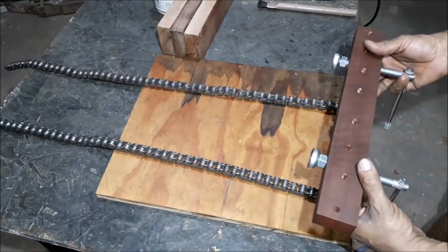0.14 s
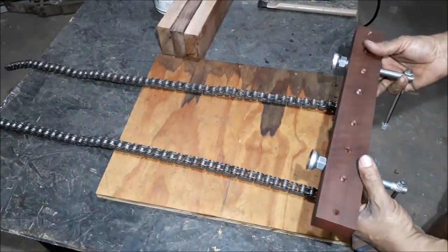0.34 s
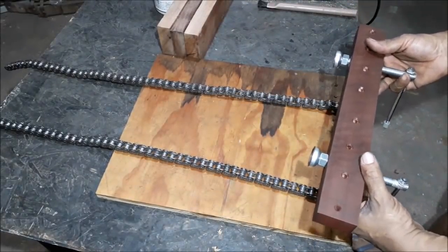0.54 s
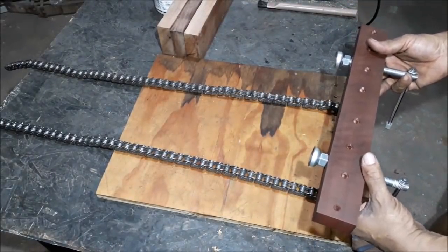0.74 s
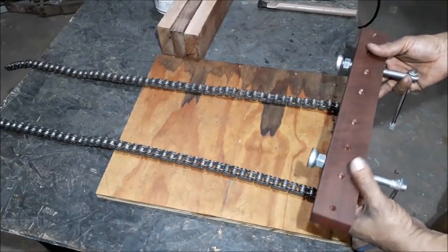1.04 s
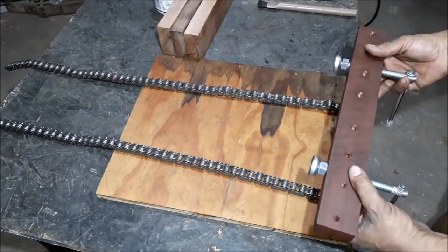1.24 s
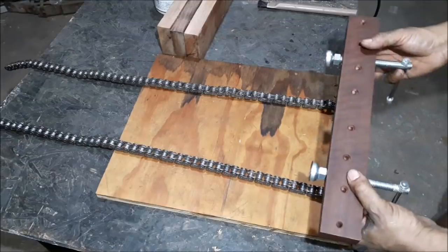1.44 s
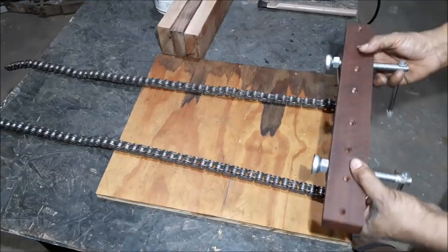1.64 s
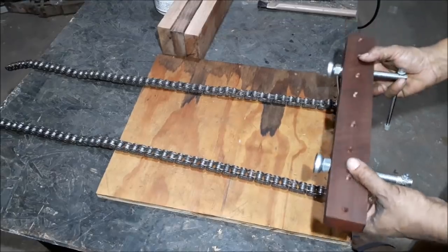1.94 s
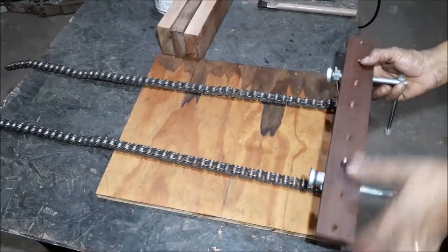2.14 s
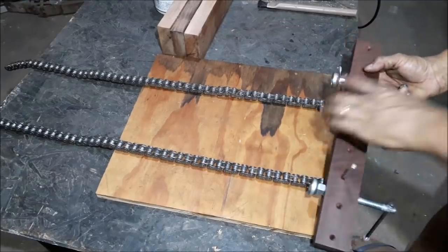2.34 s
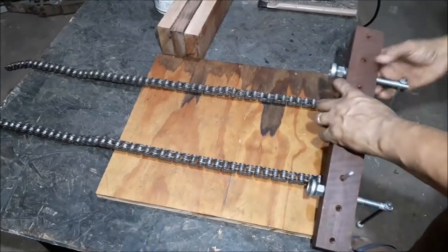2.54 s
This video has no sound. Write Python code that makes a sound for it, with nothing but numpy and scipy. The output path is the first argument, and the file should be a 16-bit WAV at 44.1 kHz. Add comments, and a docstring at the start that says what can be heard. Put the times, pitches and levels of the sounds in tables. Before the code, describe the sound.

A wooden bar with steel bolts and chains bumps and drags softly on plywood while links tick. It then tips over with a loud clack, knocks again, and a pin clinks, close by in a slightly echoing workshop.

```python
"""Dull room tone and a faint, throbbing, insect-like trill fill a workshop. Close to the microphone, a
wooden clamp bar with steel bolts and two roller chains is shifted on a plywood board: steel slides with a
hiss, the bar bumps and drags, links tick and a bolt squeaks. Then the bar tips over with a loud clack and
knocks again, and a steel pin clinks. Contact noises reverberate; the ring of wood and steel stays dry."""
import sys
import numpy as np
from scipy import signal
from scipy.fft import rfft, irfft
from scipy.io import wavfile
from scipy.ndimage import uniform_filter1d

SR = 44100
rng = np.random.default_rng(int(sys.argv[2]) if len(sys.argv) > 2 else 0)


def unload_audio(sound):
    """Save the sound as a 16-bit wav file, at the path given as the first command line argument."""
    columns = np.transpose(np.atleast_2d(sound))
    # keep every value between -1 and 1, then stretch to whole-number steps
    steps = np.round(np.clip(columns, -1, 1) * 32767)
    wavfile.write(sys.argv[1], SR, steps.astype(np.int16))


N = 119070
T = np.arange(N) / SR

# chain links snap against the bolts: (time [s], snap [dB], link ring [dB], pin ring [dB])
LINK_TICKS = [(1.585, -68, -80, -86), (1.936, -58, -54, -69), (2.108, -65.5, -73, -82),
              (2.1698, -47.5, -53.5, -81), (2.182, -47, -50, -83), (2.2544, -58.5, -75, -97),
              (2.2872, -32.5, -56, -48), (2.3061, -30.5, -46, -44), (2.43, -59, -66, -75),
              (2.4552, -45.5, -77, -61), (2.473, -52, -80, -84)]
# the pin is set down: (time [s], snap [dB], shank ring [dB], pin ring [dB])
PIN_CLINK = (2.5893, -33, -37.5, -49.5)


def amp(db):
    """Decibels to gain."""
    return 10 ** (np.asarray(db) / 20)


def rms_one(x, size=N):
    """Scale so that the first `size` samples have rms 1."""
    return x / np.sqrt(np.mean(x[:size] ** 2) + 1e-20)


def dying(t60):
    """Exponential decay by 60 dB in t60 seconds."""
    return amp(-60 * T / t60)


def convolve(x, response):
    """Play a signal through a response."""
    return signal.fftconvolve(x, response)[:N]


def colour(x, points):
    """Minimum-phase filter that follows (frequency [Hz], level [dB]) points."""
    hz, db = np.transpose(points)
    grid = np.maximum(np.fft.rfftfreq(8192, 1 / SR), 1)
    gain = amp(np.interp(np.log(grid), np.log(hz), db))
    cepstrum = irfft(np.log(gain))
    causal_fold = 1 + np.sign(np.fft.fftfreq(len(cepstrum)))
    return convolve(x, irfft(np.exp(rfft(cepstrum * causal_fold))))


def soften(x, hz):
    """Low-pass: a softer contact loses its treble."""
    return signal.sosfilt(signal.butter(2, np.clip(hz, 30, .45 * SR), fs=SR, output="sos"), x + 1e-18)


def noise_band(low_hz, high_hz):
    """Band-passed white noise."""
    band = signal.butter(2, [low_hz, high_hz], "band", fs=SR, output="sos")
    return signal.sosfilt(band, rng.standard_normal(N))


def click(time, db):
    """One impulse."""
    return amp(db) * (np.arange(N) == int(time * SR))


def ringing(modes):
    """A struck body's modes: decaying sines of alternating sign, rms 1 over the first 10 ms."""
    partials = [(-1) ** k * amp(db) * np.sin(2 * np.pi * hz * T) * dying(t60)
                for k, (hz, db, t60) in enumerate(modes)]
    return rms_one(sum(partials), size=441)


def burst(spectrum, t60, size=16384):
    """A short burst of dying noise, evened out and then coloured; rms 1 over the first 10 ms."""
    bins = rfft((rng.standard_normal(N) * dying(t60))[:size])
    local_power = uniform_filter1d(np.abs(bins) ** 2, 41)
    even = irfft(bins / np.sqrt(local_power + 1e-12))[:size // 2]
    return rms_one(colour(np.pad(even, (0, N - len(even))), spectrum), size=441)


def rubbed(strokes, response, slips_per_s, spread_db=2, attack_s=0.0021, release_s=0.057):
    """Each stroke showers a body with small, uneven slips."""
    out = 0
    for start, length, db, hz in strokes:
        slips = (rng.random(N) < slips_per_s / SR) * rng.choice([-1, 1], N)
        slips = rms_one(slips * amp(spread_db * rng.standard_normal(N)))
        attack = np.clip((T - start) / attack_s, 0, 1)
        release = np.exp(-np.maximum(T - start - length, 0) / release_s)
        body = soften(response, hz)
        out = out + amp(db) * convolve(slips * attack * release, body / np.linalg.norm(body))
    return out


def background(period_s=.1375, crest_s=.003, depth=.42):
    """Room tone and, far back, a high trill that throbs about seven times a second."""
    # spectra of the trill and the room tone: (frequency [Hz], level [dB])
    trill_spectrum = [(4800, -43), (5850, -35.5), (6200, 0.5), (6450, -2), (6680, 1), (7000, -21),
                      (8000, -44)]
    room_spectrum = [(25, -22), (70, 2), (140, 1), (350, -9), (700, -16), (2000, -24), (5000, -25),
                     (9000, -29), (16000, -28.5)]
    throb = 1 + depth * np.cos(2 * np.pi * (T - crest_s) / period_s)
    trill = amp(-69) * throb * rms_one(colour(rng.standard_normal(N), trill_spectrum))
    room_tone = amp(-68) * rms_one(colour(rng.standard_normal(N), room_spectrum))
    return trill + room_tone


def bolt(waver_hz=112):
    """Sliding steel hisses in narrow bands and briefly catches in a thin squeak."""
    # steel slides, the last one the chain rustling: (time [s], length [s], level [dB], centre [Hz], width [Hz])
    slides = [(0.244, 0.079, -71, 8700, 2170), (0.243, 0.074, -75, 4600, 1200),
              (0.854, 0.08, -79, 6540, 5000), (1.039, 0.063, -68.5, 8300, 2500),
              (1.04, 0.098, -69.5, 5090, 250), (1.324, 0.34, -75.5, 8300, 920),
              (1.494, 0.45, -74.5, 5220, 840), (1.627, 0.33, -75, 3610, 515),
              (1.713, 0.091, -75, 1180, 120), (2.121, 0.042, -53.5, 2800, 502)]
    # the bolt squeaks in its hole: (time [s], pitch [Hz], level [dB])
    squeak_path = [(1.63, 8000, -94), (1.68, 7840, -73), (1.705, 8250, -73), (1.728, 8850, -75),
                   (1.75, 9000, -97), (1.775, 8850, -75), (1.819, 8300, -76), (1.862, 7850, -80),
                   (1.89, 8150, -95)]
    times, hz, db = np.transpose(squeak_path)
    pitch = np.interp(T, times, hz) + waver_hz * rms_one(soften(rng.standard_normal(N), hz=300))
    tone = rms_one(np.sin(2 * np.pi * np.cumsum(pitch) / SR))
    squeak = np.interp(T, times, amp(db), left=0, right=0) * tone
    hiss = 0
    for start, length, db, centre, width in slides:
        swell = np.sin(np.pi * np.clip((T - start) / length, 0, 1))
        hiss = hiss + amp(db) * swell * rms_one(noise_band(centre - width / 2, centre + width / 2))
    return hiss + squeak


def bar():
    """The wooden bar knocks and drags on the plywood, shaking its bolts: (contact noise, ring)."""
    # the bar meets the board: (time [s], force [dB], brightness [Hz])
    knocks = [(0.283, -51, 293), (0.3709, -39, 260), (.379, -36, 170), (.422, -52.5, 487), (0.751, -52, 60),
              (0.873, -52, 218), (0.914, -52.5, 350), (1.047, -46, 895), (1.070, -39, 393),
              (1.127, -36.5, 212), (1.165, -38.5, 480), (1.179, -45, 1790), (1.488, -53.5, 500),
              (1.53, -62, 150), (1.988, -40, 215), (2.046, -36, 100), (2.2710, -18.5, 6640),
              (2.272, -9.5, 6940), (2.2823, -14, 1860), (2.292, -17, 1850), (2.4531, -23.5, 2160),
              (2.4588, -32.5, 1780), (2.47, -35, 900)]
    # the wood's dense, short-lived crack: (frequency [Hz], level [dB])
    crack_spectrum = [(40, -20.5), (120, 2), (330, 2.5), (480, 1), (750, -4), (1300, -6.5), (2200, -11.5),
                      (4500, -18.5), (8500, -22.5), (11000, -25.5), (16000, -18)]
    # modes of bar and board, and of the shuddering bolts: (frequency [Hz], level [dB], t60 [s])
    wood_modes = [(99, -18, .3), (140, -7, .28), (217, -4, .24), (343, 0, .26), (404, 1, .2),
                  (472, -1, .15), (635, -3, .13), (740, -7, .11), (891, -10, .1), (1044, -6, .1),
                  (1262, -3, .08), (1548, -6, .1), (1667, -8, .09), (2257, -12, .12)]
    bolt_modes = [(1254, 0, .2), (1830, -3, .25), (2200, -6, .15), (3150, -7, .15), (5000, -3, .12)]
    # the bar drags: (time [s], length [s], level [dB], brightness [Hz])
    drags = [(1.046, 0.029, -50, 2220), (1.13, 0.046, -55.5, 1200), (1.48, 0.14, -60.5, 880),
             (1.49, 0.18, -58.5, 139), (1.66, 0.27, -66, 650), (1.938, 0.11, -55, 1940),
             (1.94, 0.098, -52.5, 174), (2.125, 0.15, -50.5, 2330)]
    crack_t60_s = 0.058
    wood = ringing(wood_modes)
    blows = [soften(click(time, db), hz) for time, db, hz in knocks]
    cracks = amp(-1.5) * sum(convolve(blow, burst(crack_spectrum, crack_t60_s)) for blow in blows)
    slip = burst(crack_spectrum, crack_t60_s) + amp(-16) * wood + amp(-13) * ringing(bolt_modes)
    scrape = rubbed(drags, slip, slips_per_s=580)
    return cracks + scrape, amp(-6.5) * convolve(sum(blows), wood)


def chain(snap_t60_s=0.011):
    """Links rustle in many tiny touches and tick against the bolts: (contact noise, ring)."""
    # a link's modes: (frequency [Hz], level [dB], t60 [s])
    link_modes = [(2840, -9, .2), (3120, -10, .2), (5160, -4, .1), (5350, -5, .12), (6700, -6, .06),
                  (9948, -2, .13), (10010, -8, .1)]
    # a link's snap: (frequency [Hz], level [dB])
    snap_spectrum = [(300, -18), (2000, -12), (4400, 1.5), (5500, 7), (7500, 2.5), (10000, 1), (12000, -12),
                     (16000, -13)]
    # the chain rustles: (time [s], length [s], level [dB], brightness [Hz])
    rustles = [(1.05, .08, -79, 7050), (1.94, 0.22, -70.5, 4100), (2.128, 0.085, -59, 9000)]
    link = ringing(link_modes)
    snaps = sum(convolve(click(time, db), burst(snap_spectrum, snap_t60_s))
                for time, db, _, _ in LINK_TICKS)
    touch = burst(snap_spectrum, snap_t60_s) + .5 * link
    rustle = rubbed(rustles, touch, slips_per_s=1100)
    strikes = sum(click(time, db) for time, _, db, _ in LINK_TICKS)
    return snaps + rustle, convolve(strikes, link)


def steel_ring(sing_hz=8928, sing_t60_s=1.0, grip_s=2.405, grip_t60_s=0.092):
    """The pin rings after each tick and the clink; a second pin sings after the clack until it is gripped."""
    # the pin's two close, beating modes: (frequency [Hz], level [dB], t60 [s])
    pin_modes = [(8981, 0, .42), (8950, -2, .42)]
    strikes = sum(click(time, db) for time, _, _, db in [*LINK_TICKS, PIN_CLINK])
    pin = convolve(strikes, ringing(pin_modes))
    singing = convolve(click(time=2.290, db=-36), ringing([(sing_hz, 0, sing_t60_s)]))
    grip = amp(-60 * np.maximum(T - grip_s, 0) / grip_t60_s)
    return pin + grip * singing


def clink():
    """The pin is set down with a bright snap that rings its shank: (contact noise, ring)."""
    # the pin's snap: (frequency [Hz], level [dB])
    snap_spectrum = [(300, -25), (1300, -6), (1900, 5), (2700, -4.5), (4000, -10.5), (8800, -15),
                     (11000, -27), (12400, -22), (14000, -30)]
    # the shank's modes: (frequency [Hz], level [dB], t60 [s])
    shank_modes = [(1663, -2, .07), (1740, -2, .24), (1960, -3, .08), (2150, -6, .07), (2930, -10, .2),
                   (3085, -6, .26), (5000, -13, .08), (6358, -22, .4)]
    time, snap_db, shank_db, _ = PIN_CLINK
    snap = convolve(click(time, snap_db), burst(snap_spectrum, t60=0.006))
    return snap, convolve(click(time, shank_db), ringing(shank_modes))


def workshop(x, build_s=0.007):
    """Diffuse reverberation, each band dying at its own rate."""
    # the room's tail: (frequency [Hz], t60 [s], level [dB])
    room_decay = [(100, 0.89, -8.5), (350, 0.65, -6.5), (950, 0.57, -8.5), (2800, 0.45, -4),
                  (6050, 0.31, -9), (9000, 0.86, -12), (14800, 0.18, -3)]
    hz, t60, db = np.transpose(room_decay)
    edges, tail = np.geomspace(40, 18000, 13), 0
    for low, high in zip(edges, edges[1:]):
        log_centre = np.log(low * high) / 2
        envelope = dying(np.interp(log_centre, np.log(hz), t60)) * (1 - np.exp(-T / build_s))
        gain = amp(np.interp(log_centre, np.log(hz), db))
        tail = tail + gain * noise_band(low, high) * envelope / np.linalg.norm(envelope)
    return convolve(x, tail)


def scene():
    """From one microphone: contact noises fill the workshop; wood and steel ring close up."""
    contacts, rings = np.sum([bar(), chain(), clink()], axis=0)
    contacts = contacts + bolt()
    return (contacts + workshop(contacts) + rings + steel_ring() + background())[None]


def record(dry, low_cut_hz=70, high_cut_hz=16500):
    """The microphone drops the deep bass, overloads at full scale and cuts the top."""
    thinned = signal.sosfilt(signal.butter(2, low_cut_hz, "high", fs=SR, output="sos"), dry)
    clipped = np.clip(thinned, -1, 1)
    return signal.sosfilt(signal.cheby2(20, 70, high_cut_hz, fs=SR, output="sos"), clipped)


dry = scene()
out = record(dry)
unload_audio(out)
```